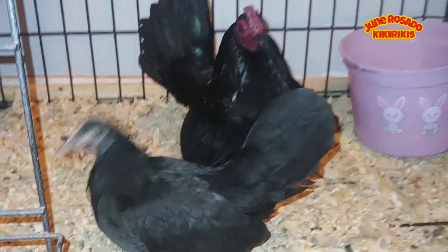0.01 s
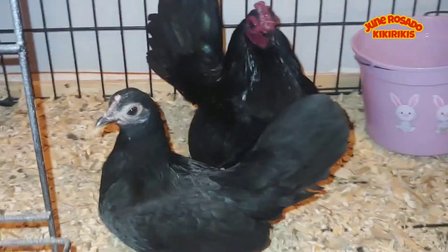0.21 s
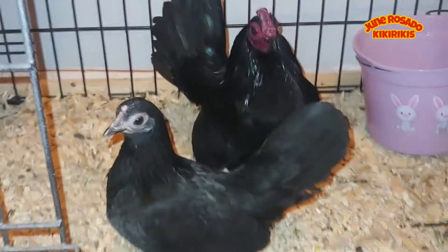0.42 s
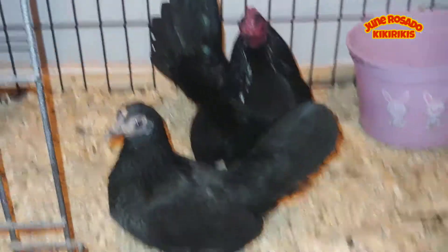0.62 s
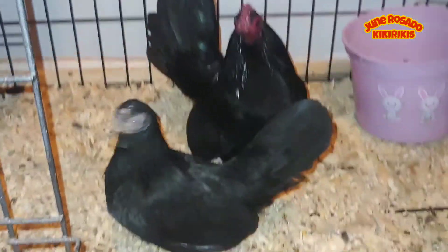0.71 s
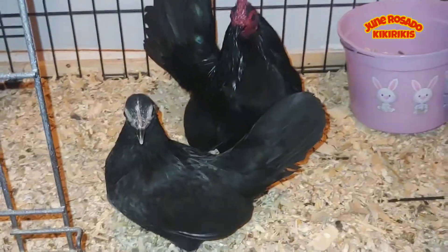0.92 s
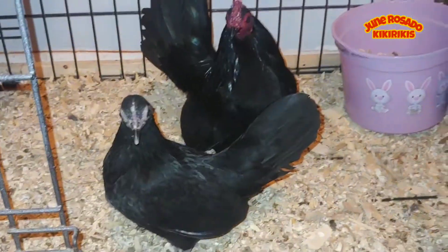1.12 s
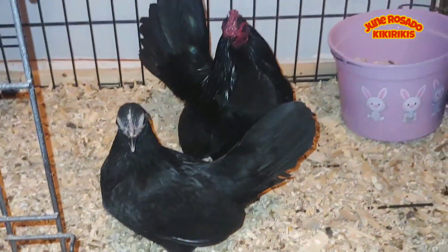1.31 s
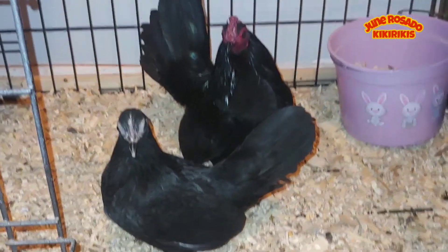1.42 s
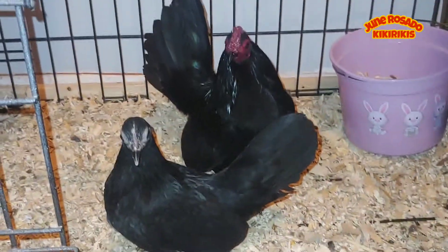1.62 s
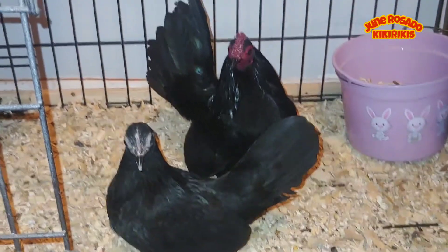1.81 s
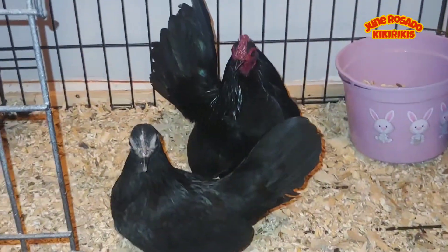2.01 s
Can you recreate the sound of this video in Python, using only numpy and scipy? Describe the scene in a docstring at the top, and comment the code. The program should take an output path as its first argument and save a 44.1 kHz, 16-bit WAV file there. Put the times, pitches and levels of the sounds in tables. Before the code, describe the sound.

Small hen's drawn-out call catches, climbs and roughens, followed by a brief hoarse cluck and rustling

```python
"""In a room with a wire cage, a small hen gives a stuttered, rising call that turns hoarse, then a short hoarse cluck.
Her voice is puff trains from two membranes sent through throat and beak resonances; wavering whistles are another
bird's faint peeps. Shaped noise makes feet and feathers rustling in shavings to the right, two soft footfalls
and the room's air; sines make the mains hum. Two microphone ports hear it all, and decaying noise answers the birds."""
import sys
import numpy as np
from scipy import signal
from scipy.fft import rfft, irfft, next_fast_len
from scipy.io import wavfile
from scipy.ndimage import uniform_filter1d, map_coordinates

SR = 44100
rng = np.random.default_rng(int(sys.argv[2]) if len(sys.argv) > 2 else 0)


def dump_mix(stems):
    """Bounce the given channels to the path in sys.argv[1] as a 16-bit WAV at rate SR."""
    frames = np.atleast_2d(stems).T  # one column per channel
    limited = np.clip(frames, -1, 1)  # hard clip at full scale
    pcm = np.round(limited * 32767).astype(np.int16)
    wavfile.write(sys.argv[1], SR, pcm)


def gain_from_db(level_db):
    """Turn a decibel level (scalar or array-like) into a linear amplitude factor."""
    decades = np.asarray(level_db, float) / 20
    return 10 ** decades


N = 92610


def unit(x):
    """Scale to rms 1."""
    return x / np.sqrt(np.mean(x ** 2) + 1e-20)


def along(points, hz, axis=1):
    """A column of (f/Hz, ..) points, read on a log frequency axis."""
    p = np.transpose(points)
    return np.interp(np.log(hz + 1), np.log(p[0] + 1), p[axis])


def curves(rows):
    """One value per sample for each column after the time."""
    s, *cols = np.transpose(rows)
    return [np.interp(np.arange(N) / SR, s, c) for c in cols]


def wobble(rate):
    """A smooth random curve, rate knots a second."""
    return map_coordinates(rng.standard_normal(4000), [np.arange(N) * rate / SR])


def filtered(x, response):
    """x times a complex response of frequency."""
    m = next_fast_len(N + SR // 2)
    spectrum = rfft(x, m) * response(np.fft.rfftfreq(m, 1 / SR))
    return irfft(spectrum, m)[..., :N]


def rush(spectrum, alike, patchy_db, grainy_db):
    """Stereo noise of rms 1 with patches of random gain and a fast grain."""
    grains = rng.standard_normal((2, N)) * gain_from_db(grainy_db * wobble(700))
    z = signal.stft(grains, nperseg=512)[2]
    field = rng.standard_normal(z.shape[1:])
    field = uniform_filter1d(uniform_filter1d(field, 6, 0), 5, 1)
    patchy = signal.istft(z * gain_from_db(patchy_db * unit(field)), nperseg=512)[1][:, :N]
    a, b = filtered(patchy, lambda hz: gain_from_db(along(spectrum, hz)))
    turn = np.arccos(np.clip(alike, 0, 1)) / 2  # sets the likeness of left and right
    shared, opposed = np.cos(turn) * a, np.sin(turn) * b
    return unit(np.array([shared + opposed, shared - opposed]))


def background():
    """Mains hum, a stack of wavering sines, and shaped room noise rise and sink together."""
    # common gain of hum and air: t/s, level/dB
    room_level = [(0, -58), (.84, -55), (.87, -65), (1.06, -62.5), (1.2, -68), (1.51, -68), (1.54, -58),
                  (1.64, -58.5), (1.67, -66), (2.1, -69)]
    # mains hum partials: f/Hz, relative level/dB
    partials = [(60, 0), (120, -5.5), (180, -14.5)]
    # spectrum of the room noise: f/Hz, relative level/dB per Hz
    air_spectrum = [(20, -27.5), (50, -4), (150, -12.5), (700, -22.5), (3800, -38), (8300, -53.5),
                    (15400, -50.5)]
    waver_db = 2.5
    t = np.arange(N) / SR
    hum = np.zeros((2, N))
    for hz, db in partials:
        sine = np.sqrt(2) * np.sin(2 * np.pi * hz * t + [[-.5], [.5]])  # right leads by 1 rad
        hum += gain_from_db(db + waver_db * wobble(19)) * sine
    air = rush(air_spectrum, alike=0.38, patchy_db=3.0, grainy_db=0)
    return gain_from_db(curves(room_level)[0]) * (hum + air) * gain_from_db([[-1.6], [1.6]])


def walls(x):
    """The room answers with decaying noise in which each frequency dies at its own speed."""
    # decay of the room: f/Hz, time to fall 60 dB/s
    decay = [(300, 0.3), (8000, 0.038)]
    hz, t, z = signal.stft(rng.standard_normal((2, SR // 2)), SR, nperseg=256)
    fading = z * gain_from_db(-60 * t / along(decay, hz)[:, None])
    tail = signal.istft(fading, SR, nperseg=256)[1]
    late = np.pad(x, ((0, 0), (150, 0)))  # the answer starts 150 samples later
    return signal.fftconvolve(late, tail / np.linalg.norm(tail[0]), axes=1)[:, :N]


def steps():
    """Soft footfalls: low noise with a quick rise and a dying ring, as of a cage floor under a foot."""
    # footfalls: t/s, level/dB before left and right are blended
    footfalls = [(0.301, -55), (1.529, -52.5)]
    floor_hz, floor_t60_s, rise_s = 201.6, 0.081, 0.0033
    t = np.arange(N) / SR
    noise = rng.standard_normal((2, N))
    shake = unit(filtered(noise, lambda f: 1 / (1 + (f / floor_hz) ** 2) * f / (f + 80)))
    swell = np.zeros(N)
    for s, db in footfalls:
        swell += gain_from_db(db - 60 * np.abs(t - s) / floor_t60_s) * np.clip((t - s) / rise_s, 0, 1)
    return swell * (shake + shake.sum(axis=0))  # the sum makes both sides more alike


def rustle():
    """Shavings and feathers: noise with a broad body and a dry treble, from the right."""
    # rustling in the shavings: t/s, body level/dB, dry treble level/dB, before the layer gains
    stirring = [(0, -72.5, -75.5), (.1, -75, -65), (.4, -79.5, -73), (.44, -65, -58.5), (.54, -74, -65.5),
                (.575, -63, -60), (.63, -73, -72.5), (.84, -66.5, -69.5), (.88, -74, -80), (1.2, -88, -89),
                (1.51, -86.5, -83), (1.538, -56.5, -57.5), (1.64, -56.5, -59.5), (1.68, -67.5, -69),
                (1.79, -93.5, -99), (1.96, -92, -94.5), (2.04, -72, -69.5), (2.1, -79, -76.5)]
    # spectrum of the body: f/Hz, relative level/dB per Hz
    body_spectrum = [(200, -21), (596, -12.5), (1120, -5.5), (2000, -4.5), (6500, -19), (8450, -48.5),
                     (14300, -120)]
    # spectrum of the dry treble: f/Hz, relative level/dB per Hz
    dry_spectrum = [(3240, -12), (6100, -1.5), (7130, 7.5), (7740, -7), (8360, -27.5), (9690, -18),
                    (11600, -17.5), (15400, -37.5)]
    body_gain_db, dry_gain_db = 11.5, 3
    body_db, dry_db = curves(stirring)
    body = rush(body_spectrum, alike=0.42, patchy_db=-0.04, grainy_db=1.0)
    body = gain_from_db(body_db + body_gain_db) * body * gain_from_db([[-2.5], [2.5]])
    treble = rush(dry_spectrum, alike=0, patchy_db=4.0, grainy_db=0.5)
    treble = gain_from_db(dry_db + dry_gain_db) * treble * gain_from_db([[-4], [4]])
    return body + treble


def peeps():
    """Another bird: short soft whistles with an octave, unsteady; the long ones are breathy."""
    # faint peeps: start t/s, length/s, first f/Hz, last f/Hz (both before the drift),
    # level/dB before the common gain, octave over fundamental/dB, left minus right/dB
    whistles = [(0.248, 0.021, 1823, 1816, -46, -34, -12), (1.689, 0.014, 1380, 1380, -57.5, -1, 3),
                (1.706, 0.05, 1408, 1310, -64, -14, 5.5), (1.946, 0.055, 2320, 2250, -68, -28.5, -1),
                (1.968, 0.05, 1363, 1350, -70.5, 2, -4.5), (2.01, 0.04, 2230, 1857, -59.5, -45, -7),
                (2.022, 0.081, 1767, 1560, -64, -34, -15)]
    gain_db, waver_db, drift_hz, breath_rad = 4, 6, 30, .8
    out, t = np.zeros((2, N)), np.arange(N) / SR
    drift = drift_hz * wobble(90)
    waver = gain_from_db(waver_db * np.tanh(wobble(100)))
    breath = breath_rad * wobble(300)
    for s, length, hz0, hz1, db, octave_db, pan_db in whistles:
        u = np.clip((t - s) / length, 0, 1)
        hz = hz0 + (hz1 - hz0) * u + drift
        turn = 2 * np.pi * np.cumsum(hz) / SR + (length > .03) * breath
        swell = np.sin(np.pi * u ** 0.56) ** 1.24
        tone = swell * (np.sin(turn) + gain_from_db(octave_db) * np.sin(2 * turn))
        out += gain_from_db(db + gain_db) * waver * tone * gain_from_db([[pan_db / 2], [-pan_db / 2]])
    return out


def throat(x, peaks):
    """Resonances, each passed twice so that the valleys stay dark, scaled to rms 1."""
    def response(f):
        once = [1j * f * w / (c * c - f * f + 1j * f * w) for c, w, _ in peaks]
        return sum(gain_from_db(peak[2]) * h ** 2 for peak, h in zip(peaks, once))
    return unit(filtered(x, response))


def pulses(hz, jitter, shimmer_db):
    """One puff per cycle of a membrane, with scatter in time (share of a cycle) and size."""
    cycle = np.cumsum(hz) / SR
    k = np.arange(1, int(cycle[-1]))
    at = np.interp(k, cycle, np.arange(N))
    luck, i = rng.standard_normal((4000, 2))[:len(k)], at.astype(int)
    at = at + luck[:, 0] * jitter[i] * SR / hz[i]
    # a windowed sinc sets each puff between samples
    taps = np.floor(at)[:, None] + np.arange(-7, 9)
    off = taps - at[:, None]
    w = np.sinc(off) * np.cos(np.pi * off / 16) ** 2
    w = w * gain_from_db(shimmer_db * luck[:, 1:])
    return np.bincount(np.clip(taps, 0, N - 1).astype(int).ravel(), w.ravel(), N)


def flutter(depth_db):
    """A fast random waver of level, bounded by depth_db either way."""
    return gain_from_db(depth_db * np.tanh(wobble(80.13)))


def catches():
    """The voice catches at the start: dips in dB, and a pitch factor that sags into the short ones."""
    # catches of the voice: middle t/s, half length/s, depth/dB
    dips = [(.254, .013, 24), (.29, .0075, 26), (.322, .008, 30), (.351, .005, 12)]
    sag_per_db = .0028  # pitch share; it overshoots after the catch
    t = np.arange(N) / SR
    pause_db, *shorts = [db * np.clip(1 - ((t - s) / half) ** 2, 0, 1) for s, half, db in dips]
    sag = uniform_filter1d(sum(shorts), size=500)
    bend = 1 - sag_per_db * (np.roll(sag, -350) - np.roll(sag, 350))
    return pause_db + sum(shorts), bend


def second_membrane():
    """A second membrane rasps: scattered puffs, strong and weak in turn."""
    # rasp: t/s, pitch f/Hz before its wobble
    pitch = [(.752, 699.7), (.77, 807.7), (.79, 742.4), (.86, 738.5), (.9, 769.8), (.94, 796.8),
             (.97, 854.8), (1.06, 883.9), (1.1, 756), (1.26, 851.3)]
    # throat of the rasp: f/Hz, width of one pass/Hz, relative level/dB
    rasp_throat = [(404, 78, -3), (809, 540, 1.5), (972.4, 86, 1.5), (1403, 405, 0.5)]
    jitter, uneven = .16, .45
    hz = curves(pitch)[0] * (1 + .025 * wobble(90))
    puffs = pulses(hz, np.full(N, jitter), shimmer_db=3.5)
    puffs = puffs * (1 + uneven * np.cos(np.pi * np.cumsum(hz) / SR))
    return throat(puffs, rasp_throat)


def hen():
    """A steady membrane gives the pitch; when hoarse it scatters, beats and a second one rasps beside it."""
    # the long call: t/s, pitch f/Hz before wobble and catches, low throat level/dB, beak level/dB
    call = [(.225, 525, -58, -50), (.23, 524.3, -38, -38), (.275, 542, -39.5, -59), (.305, 560, -42, -48.5),
            (.34, 532.4, -41, -50.5), (.45, 525.4, -41.5, -48.5), (.5, 533.4, -39.5, -48.5),
            (.56, 552.5, -43.5, -46), (.61, 589.7, -40.5, -57), (.65, 614, -42, -44),
            (.69, 601.3, -42.5, -67), (.715, 612.8, -45, -40.5), (.735, 617.7, -43, -47.5),
            (.755, 665, -34.5, -51), (.8, 690.4, -39.5, -55), (.83, 676, -38.5, -39.5),
            (.9, 650.7, -38, -41.5), (.95, 673.8, -36.5, -36.5), (1.0, 648.4, -39, -43.5),
            (1.03, 626.4, -41, -40.5), (1.065, 669.4, -35.5, -39), (1.115, 656, -41, -44),
            (1.13, 632.4, -56, -56.5)]
    # the cluck: same columns
    cluck = [(1.244, 581, -53.5, -62.5), (1.253, 580.2, -42.5, -41), (1.278, 574, -47, -46.5),
             (1.31, 600.5, -44.5, -49), (1.327, 622, -41.5, -41.5), (1.367, 600, -48, -45),
             (1.394, 600, -53.5, -61), (1.45, 608.6, -78, -67.5)]
    # hoarseness: t/s, share 0-1
    hoarseness = [(0, .15), (.75, .15), (.762, .8), (.81, .7), (.825, .3), (.86, .65), (.875, .3), (.9, .7),
                  (1.0, .65), (1.01, .22), (1.045, .22), (1.055, .7), (1.2, .6), (1.24, .15), (1.265, .2),
                  (1.28, .38), (1.37, .46), (1.385, .15)]
    # low throat, middle and beak resonances: f/Hz, width of one pass/Hz, relative level/dB
    low_peaks = [(600, 440, -1), (1023, 364, 2)]
    middle_peaks = [(1522, 56, 0)]
    beak_peaks = [(1981, 232, -2), (2785, 240, -15.5), (3290, 33, -33), (6120, 200, -28)]
    # upper low resonance over the lower: t/s, level/dB
    upper_level = [(1.2, 1), (1.262, 2.5), (1.278, -6), (1.42, -11)]
    # middle resonance: t/s, level/dB
    middle_level = [(.23, -28.5), (.38, -52), (.42, -76), (.72, -73), (.77, -66), (1.12, -45.5),
                    (1.25, -54), (1.41, -64.5)]
    waver, jitter, rough_jitter, shimmer_db = .011, 0.018, .02, 1.5
    call_beat_hz, cluck_beat_hz, beat_depth, beat_onset = 88, 240, .8, 6
    rasp_takes = 1.5  # share per unit of hoarseness above .2

    t = np.arange(N) / SR
    hz, low_db, beak_db = curves(call + cluck)
    # each phrase opens at its first row and fades at 900 dB/s after its last
    on = sum((t > c[0][0]) * gain_from_db(-900 * np.maximum(t - c[-1][0], 0)) for c in (call, cluck))
    rough, = curves(hoarseness)
    catch_db, bend = catches()
    hz = hz * (1 + waver * (1 + 2 * rough) * wobble(70)) * bend

    # the two membranes beat, slowly in the call, fast in the cluck
    share = np.clip(rasp_takes * (rough - .2), 0, 1)
    beat_hz = np.where(t < cluck[0][0], call_beat_hz, cluck_beat_hz) * (1 + .13 * wobble(50))
    swing = np.sin(2 * np.pi * np.cumsum(beat_hz) / SR)
    beat = 1 + beat_depth * np.clip(beat_onset * share, 0, 1) * swing

    main = pulses(hz, jitter + rough_jitter * rough ** 2, shimmer_db)
    soft = main * np.sqrt(beat) * flutter(1.23)
    upper = gain_from_db(curves(upper_level)[0]) * throat(soft, low_peaks[1:])
    clear = (throat(soft, low_peaks[:1]) + upper) / np.sqrt(2)
    low = np.sqrt(1 - share) * clear + np.sqrt(share) * second_membrane()
    middle = throat(main * beat * flutter(7.5), middle_peaks)
    beak = throat(main * beat * flutter(1.11), beak_peaks)
    voice = gain_from_db(low_db) * low + gain_from_db(curves(middle_level)[0]) * middle + gain_from_db(beak_db) * beak
    return np.minimum(on, 1) * gain_from_db(-catch_db) * voice


def scene():
    """Birds at the two microphone ports and in the room, over rustle, footfalls and background."""
    # the hen at the ports: f/Hz, left minus right/dB, lead of the left/rad
    port = [(308, 1, -1), (1400, 1, 1), (1990, -4, 7), (3170, -2.5, 8.5), (6160, -6.5, 10.5)]
    wet_db = -13
    treble_edge_hz = 7300  # the hen's voice drops steeply above
    right_lag_s = 0.000294  # rustle, footfalls and background reach the right port later
    side = np.array([[.5], [-.5]])

    def at_ports(f):
        lead = np.exp(1j * side * along(port, f, axis=2))
        return gain_from_db(side * along(port, f)) * lead / (1 + (f / treble_edge_hz) ** 20)

    around = background() + steps() + rustle()
    around = filtered(around, lambda f: np.exp(2j * np.pi * f * side * right_lag_s))
    birds = peeps() + filtered(hen(), at_ports)
    return birds + gain_from_db(wet_db) * walls(birds) + around


def band_limit(x):
    """A steep low-pass at the top of the band."""
    return signal.sosfilt(signal.butter(12, 15600, fs=SR, output="sos"), x)


def record(dry):
    """The finished mix as the phone keeps it."""
    return band_limit(dry)


dry = scene()
out = record(dry)
dump_mix(out)
```